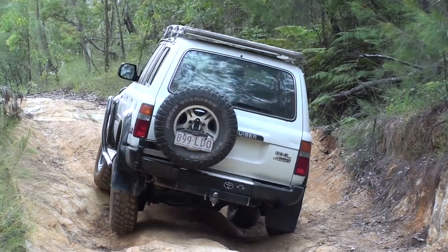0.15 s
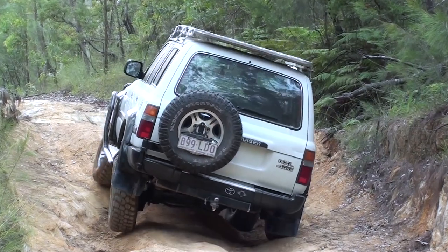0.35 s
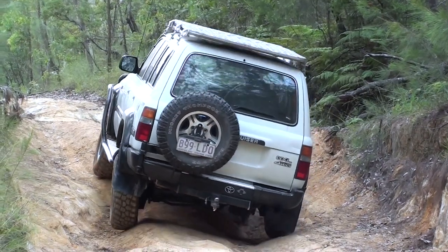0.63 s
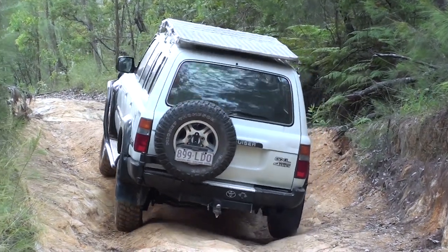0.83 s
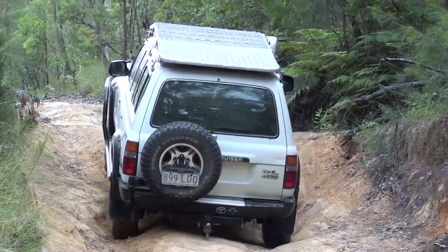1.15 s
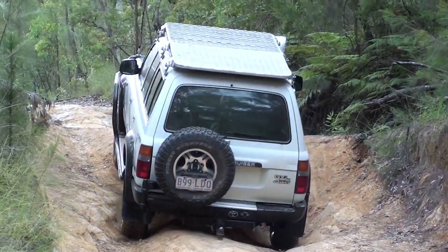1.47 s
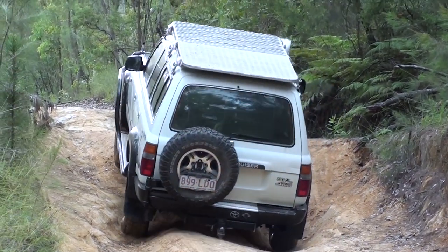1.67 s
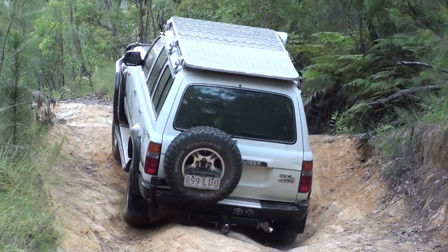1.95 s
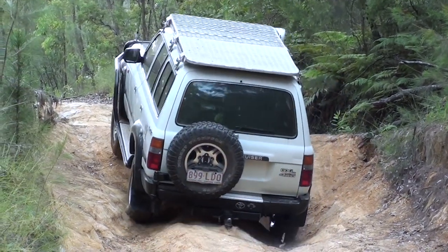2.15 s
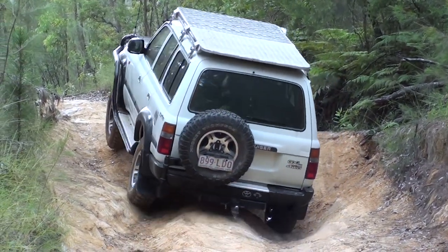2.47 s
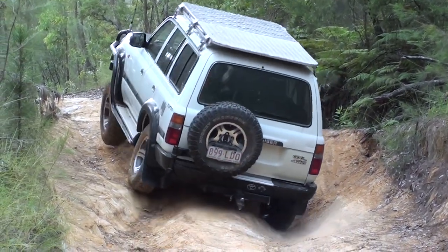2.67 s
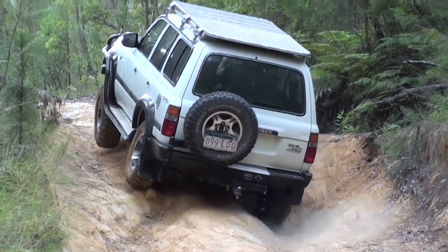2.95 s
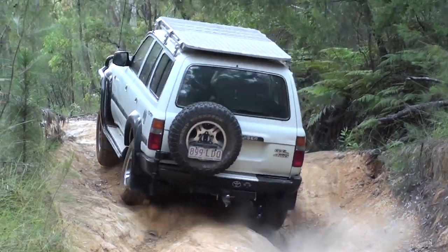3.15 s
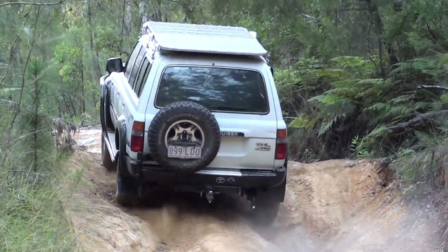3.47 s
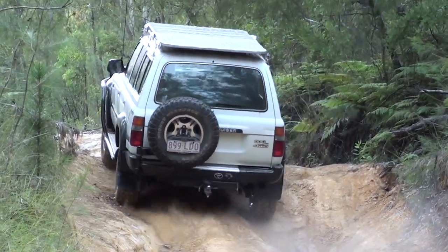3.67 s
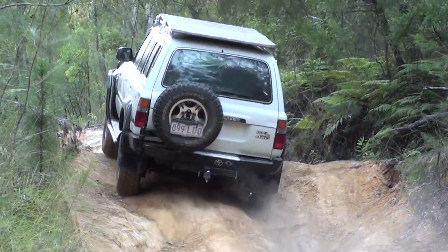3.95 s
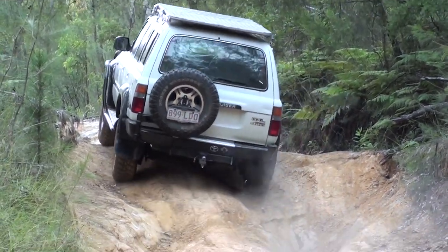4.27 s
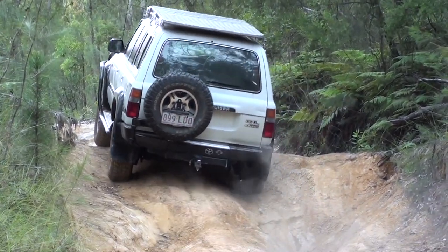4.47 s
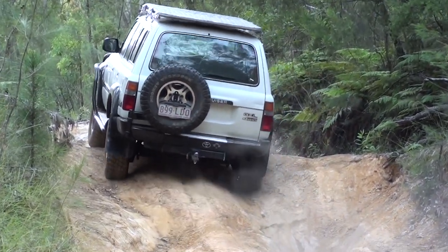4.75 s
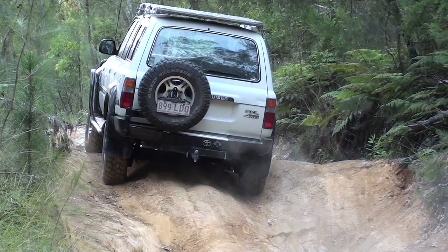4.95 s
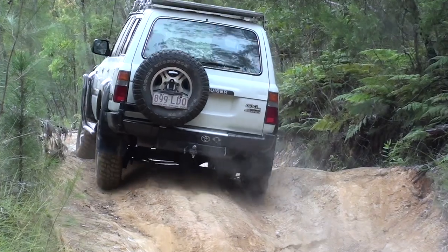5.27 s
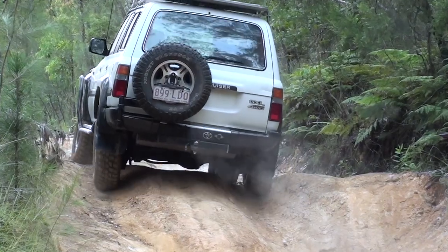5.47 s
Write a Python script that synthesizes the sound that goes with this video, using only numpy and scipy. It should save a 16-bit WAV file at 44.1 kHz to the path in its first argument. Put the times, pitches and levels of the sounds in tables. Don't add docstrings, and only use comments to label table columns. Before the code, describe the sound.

Outdoors in bushland, a six-cylinder diesel truck idles just ahead with a low rumble, clattering valves and grinding tyres. Around two seconds it picks up, then roars to a peak near three as a wheel spins and flings grit. It falls quickly back to idle. Bright cicadas buzz throughout, dipping in level at the rev and creeping back as the stereo recorder's automatic gain recovers.

```python
import sys
import numpy as np
from scipy import signal
from scipy.fft import rfft, irfft, next_fast_len
from scipy.io import wavfile
from scipy.ndimage import uniform_filter1d, minimum_filter1d

SR = 44100
rng = np.random.default_rng(int(sys.argv[2]) if len(sys.argv) > 2 else 0)


def file_out(sig):
    cols = np.atleast_2d(sig).T
    lim = np.clip(cols, -1, 1)
    pcm = np.round(lim * 32767).astype(np.int16)
    wavfile.write(sys.argv[1], SR, pcm)


def boost_factor(decibels):
    exponent = np.asarray(decibels, float) / 20
    return 10 ** exponent


N = 247401
IDLE_PER_S, IDLE_DB = 65, -32


def rms_one(x):
    return x / np.sqrt(np.mean(x ** 2) + 1e-20)


def in_time(rows):
    s, *columns = np.transpose(rows)
    return [np.interp(np.arange(N) / SR, s, column) for column in columns]


def at_pitch(points, hz):
    table_hz, value = np.transpose(points)
    return np.interp(np.log(hz), np.log(table_hz), value)


def at_hz(points):
    size = next_fast_len(N)
    return at_pitch(points, np.maximum(np.arange(size // 2 + 1) * SR / size, 1))


def coloured(x, spectrum):
    (low_hz, low_db), (high_hz, high_db) = spectrum[0], spectrum[-1]
    closed = [(low_hz * 0.7, low_db - 40), *spectrum, (high_hz * 1.3, high_db - 40)]
    size = next_fast_len(N)
    return rms_one(irfft(rfft(x, size) * boost_factor(at_hz(closed)), size)[..., :N])


def drift(rate):
    r = np.exp(-80 * np.pi * rate / SR)
    slow = signal.lfilter([1], [1, -2 * r, r * r], rng.standard_normal(N // 40 + 2002))[2000:]
    return np.interp(np.arange(N) / 40, np.arange(len(slow)), rms_one(slow))


def wide_noise(side_db):
    mid, side = rng.standard_normal((2, N))
    return mid + boost_factor(side_db) * side * [[1], [-1]]


def grains(per_s, spread_db):
    sizes = boost_factor(spread_db * np.minimum(rng.exponential(1, N), 5))
    sizes *= rng.choice([-1, 1], N)
    return sizes * (rng.random(N) < per_s / SR)


def panned(x, pan_db):
    return x * boost_factor(np.array([[pan_db / 2], [-pan_db / 2]]))


def law(rule, per_s, firing_db):
    idle_db, octave_db, share, loss_db = rule
    speed_db = octave_db * np.log2(per_s / IDLE_PER_S)
    return idle_db + speed_db + share * (firing_db - IDLE_DB) - loss_db * np.arange(N) / SR


def wheel_spin(per_s):
    lag_s, from_per_s, range_per_s = 0.08, 95, 32
    wheel_per_s = np.interp(np.arange(N) - lag_s * SR, np.arange(N), per_s)
    return np.clip((wheel_per_s - from_per_s) / range_per_s, 0, 1)


# time_s, firings_per_s
ENGINE_SPEED = [(0.1, 65.1), (0.42, 62.5), (0.78, 66.5), (1.0, 64.6), (1.34, 69.2), (1.71, 63.0),
                (1.98, 81.0), (2.12, 86.4), (2.52, 92.3), (2.72, 106.0), (3.3, 155.5), (3.57, 126.6),
                (3.99, 77.0), (4.13, 70.0), (4.35, 74.8), (4.78, 68.3), (5.2, 73.7), (5.61, 69.4)]
# time_s, firing_db
THROTTLE_STRENGTH = [(0.0, -35), (0.42, -35), (0.75, -32.5), (1.6, -31.5), (1.72, -27), (2.04, -18.5),
                     (2.36, -18), (2.72, -3.5), (2.9, -5.5), (3.2, -5), (3.4, -13), (3.57, -15),
                     (3.99, -39.5), (4.16, -42.5), (4.78, -27), (5.2, -36), (5.5, -32)]


def engine():
    return uniform_filter1d(in_time(ENGINE_SPEED) + in_time(THROTTLE_STRENGTH), size=SR // 14, mode="nearest")


# pitch_hz, level_db at idle strength
PIPE_RESPONSE = [(128, -18.5), (145, -22), (158, -23.5), (172, -35), (190, -32.5), (214, -47), (245, -41),
                 (300, -37.5)]
# pitch_hz, level_db
FAN_RESPONSE = [(205, -35.5), (240, -33), (283, -29), (330, -29), (390, -30), (470, -42)]
# firing_rate_multiple, level_db re rumble
UNEVEN_LINES = [(4 / 3, -14), (3 / 2, -12), (5 / 3, -18), (7 / 3, -17), (8 / 3, -9), (3, -11), (4, -16),
                (5, -18)]
# pitch_hz, level_db per Hz
RUMBLE_SPECTRUM = [(26, -34), (45, -23), (96, -8), (140, 2), (184, 4), (234, -1), (290, -3.5), (376, -8.5),
                   (429, -59), (600, -37.5), (780, -95), (1320, -120)]
# idle_db, rise_db per octave, effort_share of firing strength, loss_db per s
RUMBLE_SCALING = (-28, 7, 0.2283, 0.12)


def exhaust(turns, per_s, firing_db):
    fan_order, silencer_hz = 3.215, 410
    effort_db = firing_db - IDLE_DB
    overrun = np.clip(-np.gradient(per_s) * SR / 46, 0, 1)
    rumble_db = law(RUMBLE_SCALING, per_s, firing_db)

    second_db = at_pitch(PIPE_RESPONSE, 2 * per_s) + 0.53 * effort_db - 1.25 + 0.9 * drift(5.4)
    fan_db = at_pitch(FAN_RESPONSE, fan_order * per_s) - 0.077 * effort_db
    fan_db += overrun * (4.0 * drift(12) - 2.5)
    lines = boost_factor(firing_db + 0.3) * np.sin(turns)
    lines += boost_factor(second_db) * np.sin(2 * turns + 0.98)
    lines += boost_factor(fan_db + 3.2 + 1.6 * drift(7)) * np.sin(fan_order * turns)

    uneven_db = rumble_db - 1.5 * overrun
    for order, level_db in UNEVEN_LINES:
        level = boost_factor(uneven_db + level_db + 2.5 * drift(6))
        lines += level * np.sin(order * turns + 1.0 * drift(6))
    silencer = signal.butter(10, silencer_hz, fs=SR, output="sos")
    lines = signal.sosfilt(silencer, lines)

    puffs = 1 + 0.46 * np.cos(turns)
    rumble = coloured(wide_noise(-58) * puffs, RUMBLE_SPECTRUM)
    return panned(np.sqrt(2) * lines, 0.076) + boost_factor(rumble_db + 0.46) * rumble


# pitch_hz, level_db per Hz
CLATTER_SPECTRUM = [(240, -56), (400, -22), (415, -33), (445, -31), (577, -11), (811, -1.5), (945, -12.5),
                    (1930, 0), (3400, -5.5), (4420, -3.5), (7480, -120)]
# idle_db, rise_db per octave, effort_share of firing strength, loss_db per s
CLATTER_SCALING = (-34.5, 1.5, 0.0027, 0.06)


def clatter(turns, clatter_db):
    strikes = wide_noise(-25.0) * (1 + 0.11 * np.cos(turns))
    return panned(boost_factor(clatter_db + 2.5) * coloured(strikes, CLATTER_SPECTRUM), 1.5)


# pitch_hz, width_hz
SQUEAK_RESONANCE = (1460, 340)
# peak_s, level_db, half_length_s
BODY_TWISTS = [(0.24, -32, 0.048), (0.515, -31, 0.09), (1.0, -32.5, 0.26), (1.77, -30, 0.12),
               (2.275, -51, .2), (2.775, -21, .03), (3.2, -20, 0.46), (3.58, -20, 0.036),
               (4.469, -28, 0.14), (5.0, -32.5, 0.11), (5.581, -30, 0.096)]


def squeak(clatter_db):
    t = np.arange(N) / SR
    steady = boost_factor(-26.5 + 4 - 6 * t)
    flares = sum(boost_factor(db) * np.exp(-((t - s) / half) ** 2) for s, db, half in BODY_TWISTS)
    squeak_db = 20 * np.log10(steady + flares)
    hz, width = SQUEAK_RESONANCE
    r = np.exp(-np.pi * width / SR)
    slips = grains(2500, spread_db=1.5) * boost_factor(1.2 * drift(12))
    ringing = signal.lfilter([1, 0, -1], [1, -2 * r * np.cos(2 * np.pi * hz / SR), r * r], slips)
    stands_out = np.clip(squeak_db - clatter_db + 1.5, -6, 6)
    return panned(boost_factor(squeak_db - 11 + 0.56 * stands_out) * rms_one(ringing), 0.27)


# pitch_hz, level_db per Hz
GRIND_SPECTRUM = [(240, -19), (400, -3), (433, -8), (514, -8.5), (875, -4), (1110, -8.5), (1380, -7.5),
                  (1890, -17), (2260, -25.5), (2600, -24.5), (3380, -17), (5720, -120)]
# idle_db, rise_db per octave, effort_share of firing strength, loss_db per s
GRIND_SCALING = (-32, 6.5, 0.0763, 0.48)


def tread_grind(per_s, firing_db, spin):
    grind_db = law(GRIND_SCALING, per_s, firing_db) + 6 * spin
    lumps = boost_factor(0.25 * drift(4.4))
    grit = 0.13 * rms_one(grains(400, spread_db=2.0))
    grind = coloured(wide_noise(-24) * lumps + grit, GRIND_SPECTRUM)
    return panned(boost_factor(grind_db - 0.4) * grind, 0.85)


# centre_hz, width_hz, level_db
ABDOMENS = [
    (5650, 720, -1.5),
    (5960, 330, -1),
    (5800, 620, -4),
]
DRONE_CLICKS = [
    239.3,
    238.55,
    222.15,
]


def drone():
    t = np.arange(N) / SR
    spacing_hz = 220
    nodes = np.arange(4400, 7100, spacing_hz)
    paths = [2.2 + drift(9) + 1j * drift(9) for hz in nodes]
    mid, side = np.zeros((2, N))
    for per_s, (centre_hz, width_hz, level_db) in zip(DRONE_CLICKS, ABDOMENS):
        turns = 2 * np.pi * per_s * t + 0.055 * drift(5)
        for k in range(int(4700 / per_s), int(6800 / per_s) + 1):
            hz = k * per_s
            node = int(round((hz - nodes[0]) / spacing_hz))
            gain = boost_factor(level_db) / (1 + abs((hz - centre_hz) / width_hz) ** 3)
            line = gain * np.exp(1j * k * (turns + 0.3 * k))
            mid += (paths[node] * line).real
            side += (paths[node - 5] * line).real
    return rms_one(panned(mid, -1.8) + boost_factor(-19.0) * side * [[1], [-1]])


# time_s, lead_strokes
STROKE_LEAD = [
    (0, -.2),
    (1.25, .18),
    (1.9, .23),
    (3.5, .16),
    (5.61, .17),
]
# delay_ms, level_db
RIB_CLICKS = [
    (0, 0),
    (1.7, -4),
    (3.6, -8),
    (5.3, -19),
    (7.1, -10),
    (8.8, -13),
    (10.5, -34),
]
# pitch_hz, level_db per Hz
RATTLE_SPECTRUM = [(6300, -22), (6600, -14), (6900, -7), (7400, 0), (7900, 0), (8350, -5), (8700, -14),
                   (9100, -24), (9600, -32)]


def rattle():
    per_s = 81.75
    steady = np.arange(int(N / SR * per_s) + 1) / per_s
    strokes = steady - np.interp(steady, *np.transpose(STROKE_LEAD)) / per_s
    lag_ms, level_db = np.transpose(RIB_CLICKS)
    time_chance, level_chance = rng.standard_normal((2, len(strokes), len(lag_ms)))
    click_s = strokes[:, None] + 0.001 * (lag_ms + 0.035 * time_chance)
    at = np.round(click_s * SR).astype(int)
    inside = (at >= 0) & (at < N)
    clicks = np.zeros(N)
    clicks[at[inside]] = boost_factor(level_db + 1.0 * level_chance)[inside]
    echoes = boost_factor(-0.5) * wide_noise(-11.5)
    return coloured(panned(rms_one(clicks) + echoes, 3.1), RATTLE_SPECTRUM)


# pitch_hz, level_db per Hz
CHORUS_SPECTRUM = [(2800, -17), (3480, -12), (3720, -1), (4500, -2), (5200, -4.5), (6000, -5), (6500, -6)]


def chorus():
    return coloured(wide_noise(-17) * boost_factor(0.72 * drift(9.1)), CHORUS_SPECTRUM)


# pitch_hz, level_db per Hz
AIR_SPECTRUM = [(9200, 4), (9900, 5.5), (10400, -4), (12000, -3.5), (13000, -7.5), (15750, -10)]


def air():
    return coloured(rng.standard_normal(N) * boost_factor(1.4 * drift(5)), AIR_SPECTRUM)


def insects(gain_db):
    insects_db = -20 + gain_db
    singers = boost_factor(1.05) * rattle() + boost_factor(0.98) * drone() + boost_factor(-8.0) * chorus()
    return boost_factor(insects_db) * singers + boost_factor(0.61 * insects_db - 34.5) * air()


def gain_control():
    duck_at_s, quick_s, quick_db, slow_s, slow_db, creep_db_per_s = 2.554, 0.17, 4.5, 0.87, 2.5, 2.15
    t = np.arange(N) / SR - duck_at_s
    down = quick_db * np.clip(t / quick_s, 0, 1)
    down += slow_db * np.clip((t - quick_s) / slow_s, 0, 1)
    return creep_db_per_s * np.maximum(t - quick_s - slow_s, 0) - down


# pitch_hz, level_db per Hz
SPRAY_SPECTRUM = [(8500, 0), (10000, -3), (12000, -8), (13000, -14), (15700, -22)]


def grit_spray(spin):
    grit = rng.standard_normal(N) + 0.5 * rms_one(grains(1500, spread_db=3.0))
    return boost_factor(-38.5) * np.sqrt(spin) * coloured(grit, SPRAY_SPECTRUM)


def engine_whine(turns, spin):
    whine = boost_factor(2.5 * drift(14)) * np.sin(6.2 * turns + 1.5 * drift(20))
    return panned(boost_factor(-26) * spin ** 4 * whine, 0.85)


def scene():
    per_s, firing_db = engine()
    turns = 2 * np.pi * np.cumsum(per_s) / SR
    spin = wheel_spin(per_s)
    clatter_db = law(CLATTER_SCALING, per_s, firing_db)
    gain_db = gain_control()
    truck = exhaust(turns, per_s, firing_db)
    truck = truck + clatter(turns, clatter_db) + squeak(clatter_db)
    truck = truck + tread_grind(per_s, firing_db, spin)
    truck = truck + grit_spray(spin) + engine_whine(turns, spin)
    return boost_factor(gain_db) * truck + insects(gain_db)


# pitch_hz, right_lead_rad
PORT_PHASE = [(75, .1), (95, .45), (400, .46), (900, .3), (1400, .15), (2500, .25), (9000, .05)]


def microphone(dry):
    lead = np.exp(0.5j * at_hz(PORT_PHASE) * np.array([[-1], [1]]))
    size = next_fast_len(N)
    return irfft(rfft(dry, size) * lead, size)[:, :N]


def limiter(x, top):
    room = np.minimum(1, top / np.maximum(np.abs(x).max(axis=0), 1e-9))
    return x * uniform_filter1d(minimum_filter1d(room, size=257), size=257)


def roll_off(x):
    return signal.sosfilt(signal.butter(12, 15830, fs=SR, output="sos"), x)


def record(dry):
    mix = limiter(microphone(dry), top=0.96)
    return roll_off(mix)


dry = scene()
out = record(dry)
file_out(out)
```